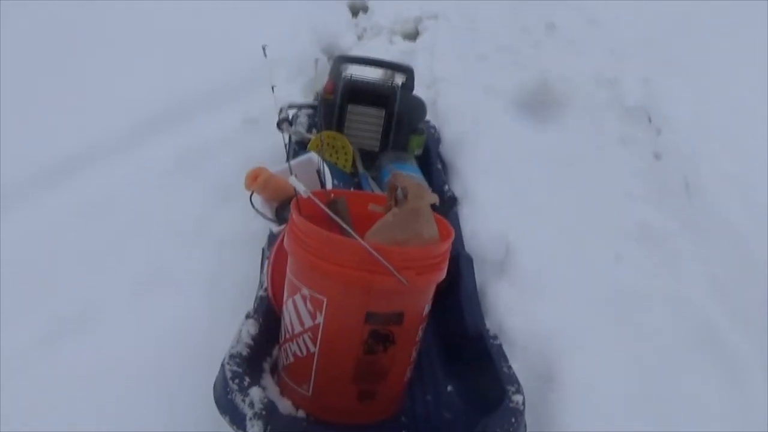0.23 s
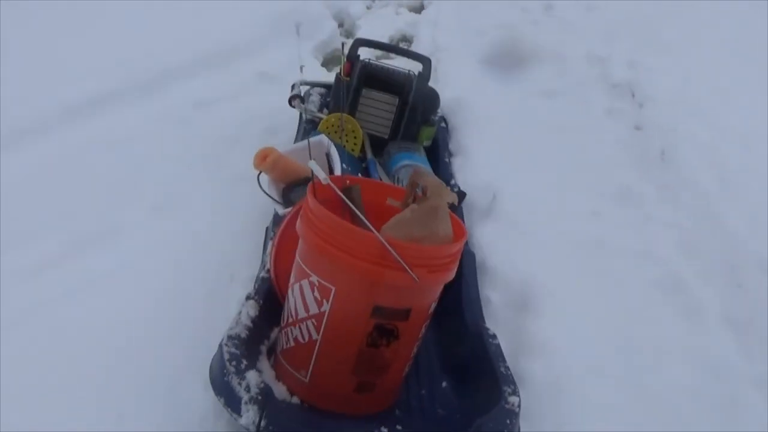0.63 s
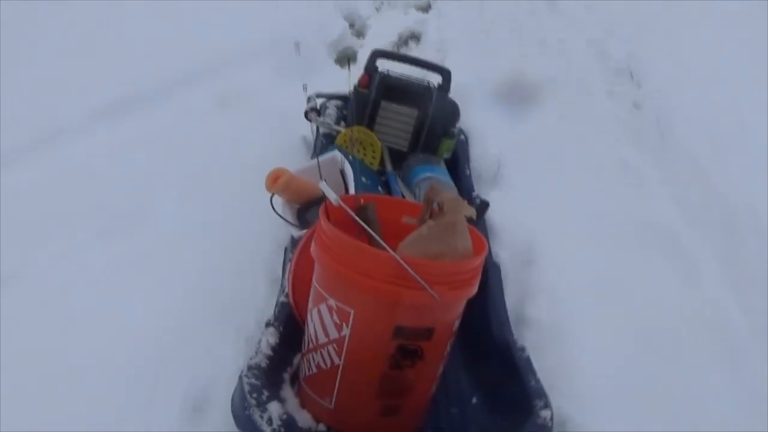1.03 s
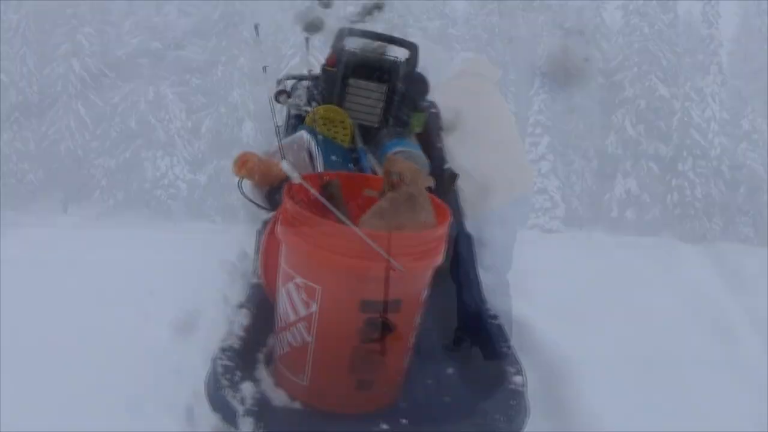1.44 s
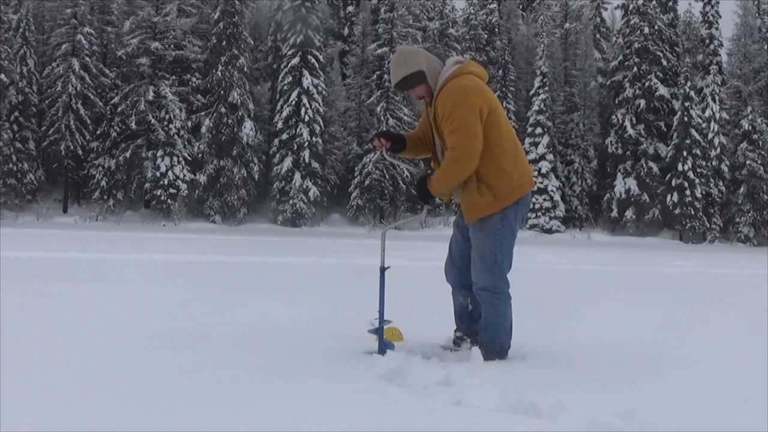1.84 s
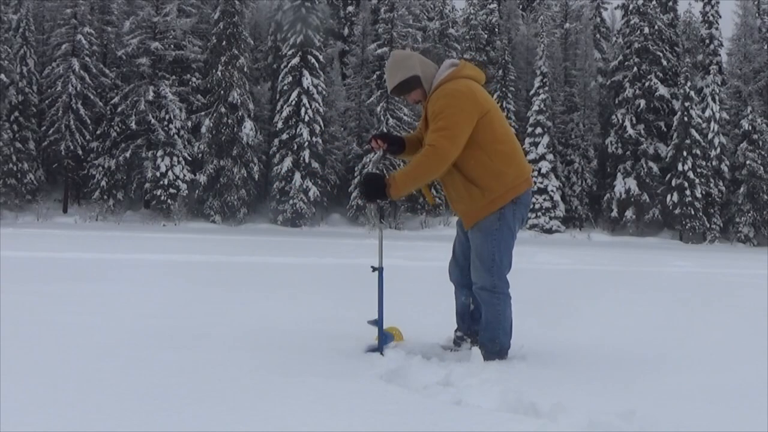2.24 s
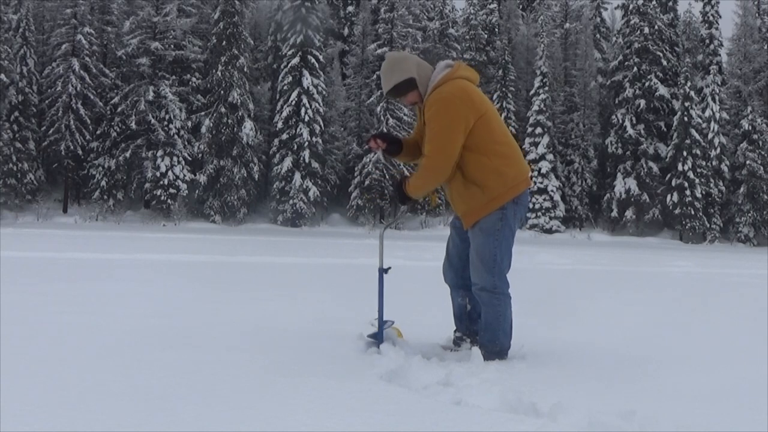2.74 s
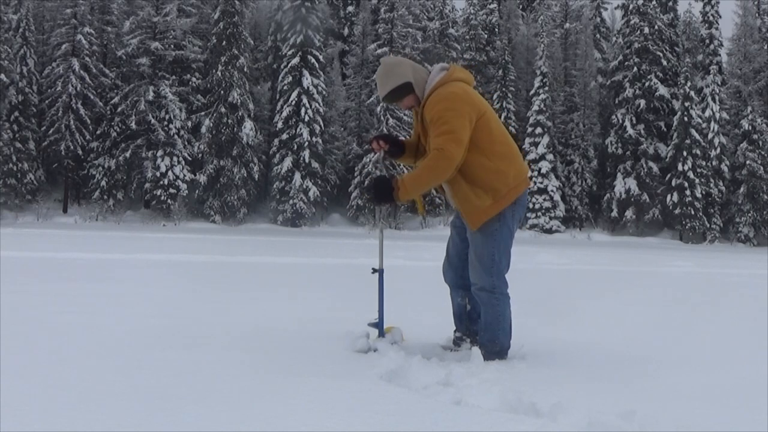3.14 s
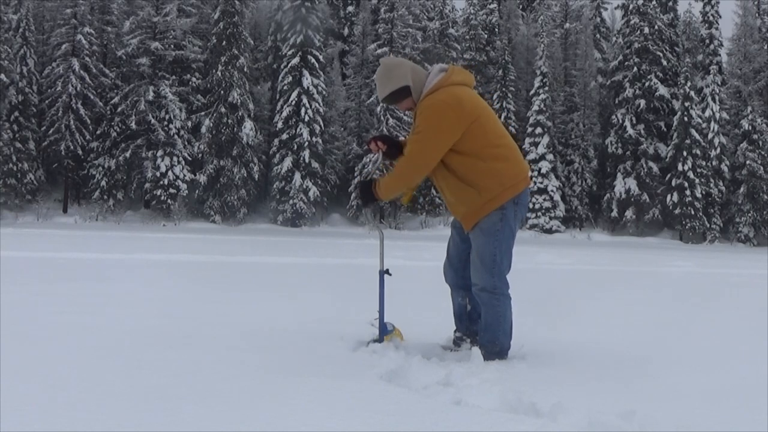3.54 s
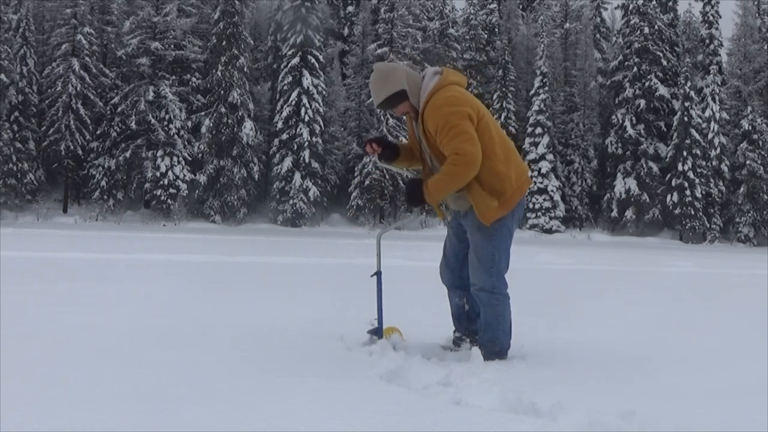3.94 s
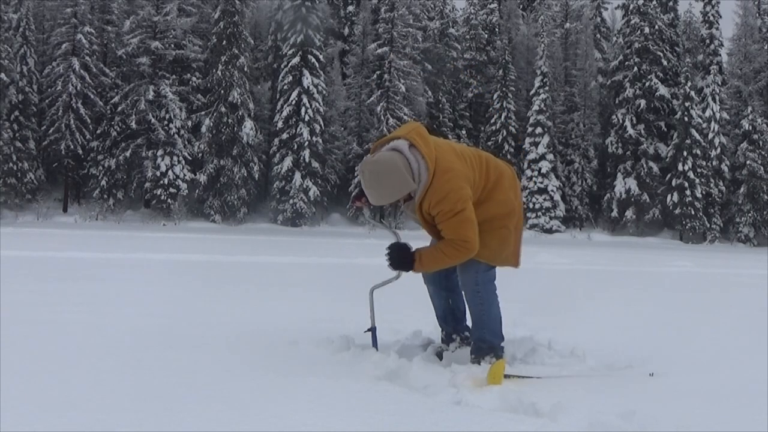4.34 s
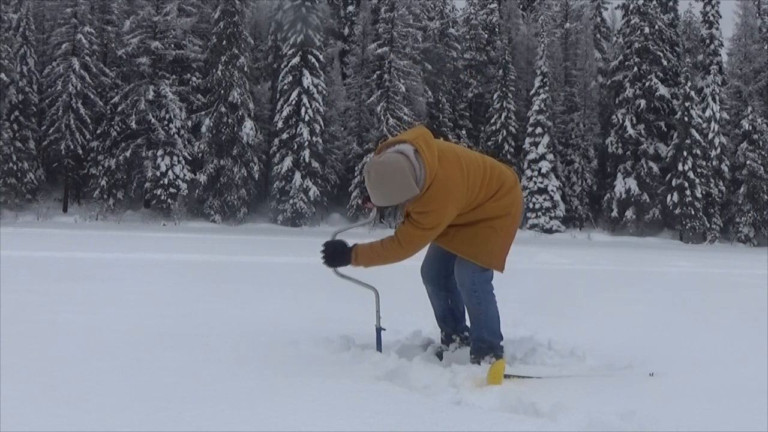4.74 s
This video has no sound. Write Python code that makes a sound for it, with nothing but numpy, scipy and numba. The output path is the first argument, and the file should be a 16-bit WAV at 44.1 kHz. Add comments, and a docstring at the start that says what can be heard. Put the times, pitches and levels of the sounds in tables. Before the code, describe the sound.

Sled hull grinding and hissing over deep snow dissolves into gritty, ringing scrapes of a hand ice auger, ending with metallic squeals.

```python
"""A loaded plastic sled grinds through deep snow: slips thump the hull, runners scrape, crystals hiss, crust crunches.
It dissolves to a hand auger shaving lake ice near the surface: chattering blades rasp the ice and ring the steel.
Then it jumps to the same auger deep in its hole, stalling, ticking as chips snap, biting again and squealing.
Filtered noise makes every layer. The place is an open snowfield: no echo reaches the stereo microphone."""
import sys
import numpy as np
from scipy import signal
from scipy.fft import rfft, irfft, next_fast_len
from scipy.io import wavfile
from scipy.ndimage import uniform_filter1d
from numba import njit

SR = 44100
rng = np.random.default_rng(int(sys.argv[2]) if len(sys.argv) > 2 else 0)


def pcm_store(signal):
    """Save signal as 16-bit PCM."""
    levels = np.round(np.clip(np.atleast_2d(signal), -1, 1) * 32767)
    wavfile.write(sys.argv[1], SR, levels.astype(np.int16).T)


N = 219814
T = np.arange(N) / SR  # time in s

# resonances of the sled hull: centre_hz, width_hz, relative_level_db
HULL_MODES = [(91, 74, -34), (143.4, 59, -3), (193.3, 36, 2), (243, 53, -0.5), (330, 115, -5),
              (457, 84, -4.5), (606, 174, -9), (715, 74, -15)]
# spectrum of the runner scrape: frequency_hz, level_db per Hz
SCRAPE_SPECTRUM = [(600, -13), (800, -1), (1000, -1), (1200, -4.5), (1700, -4.5), (2000, -10)]
# spectrum of the hissing snow crystals: frequency_hz, level_db per Hz
SNOW_SPECTRUM = [(1060, -36), (1800, -5.5), (2160, -4.5), (2980, -2), (3240, -6), (3710, -1.5),
                 (5270, -2.5), (6540, -6.5), (8580, 0), (9640, -5), (10600, -12.5), (15600, -28.5)]
# hull, runner scrape, snow hiss, before lurches and the hiss sag: level_db at 0 s, drift_db_per_s, fade_exponent
SLED_LEVELS = [(-26, 0.55, 1.3), (-32, -4, 1.8), (-27, -0.22, 0.97)]
# the sled lurches or rides light: start_s, length_s, hull_db, scrape_db
LURCHES = [(0.073, .03, -1, -1), (.11, 0.027, 0.5, 2.5), (.285, .025, 0.5, -1), (0.416, 0.045, -2.5, -0.5),
           (0.503, .025, -4, -2), (0.968, 0.026, 0, -2), (1.131, 0.015, 5, 3), (0.847, .035, -3, 0.5),
           (0.2, 0.063, -1.5, 1.5), (0.346, 0.032, 1.5, -5), (0.567, 0.12, 0.5, -1.5),
           (0.7, 0.12, -3.5, -1), (0.83, 0.046, 0.5, 1), (0.912, .022, 1, 0.5), (0.93, 0.016, -11, -5),
           (0.995, 0.18, -3, 0), (1.162, 0.028, 3.5, 0), (1.204, .022, -7.5, 0), (1.233, 0.02, 2, 0),
           (1.256, 0.059, -10, -2.5)]
# snow crust crunching under the hull: start_s, peak_db, centre_hz, t60_s
CRUNCHES = [(0.0375, -16, 1300, 0.03), (0.1161, -17.5, 4280, 0.03), (0.135, -18, 4700, 0.012),
            (0.1506, -23, 1640, 0.04), (0.1595, -17, 4800, 0.03), (0.2173, -17, 2300, 0.012),
            (0.1052, -20, 2800, .015), (0.3315, -21, 3000, .015), (0.2677, -13, 2400, 0.01),
            (0.2685, -18, 5200, 0.008), (0.4648, -18, 5600, 0.04), (0.469, -16.5, 4850, .03),
            (0.4738, -17, 3010, 0.025), (0.83, -17, 970, .03), (0.8744, -18, 1660, 0.025)]
# place of the sled between the channels: frequency_hz, left_minus_right_db, left_lead_rad
SLED_PAN = [(25, -5, .3), (110, -3.5, .1), (200, -2.5, .2), (400, -2, .4), (700, 0, .3), (1300, .5, .15),
            (1900, 0, 0), (2700, -1.2, -.3), (3300, -.6, 0), (4000, -.3, .25), (5300, 0, 0),
            (7300, -.1, -.25), (8600, 0, 0)]
# stereo width of the sled: frequency_hz, side_minus_mid_db
SLED_WIDTH = [(25, -6), (60, -16), (400, -19), (1300, -15), (1900, -24), (3300, -12), (4500, -22),
              (5300, -40), (6500, -16), (8200, -18), (9000, -60), (15000, -70)]
# fade-out of the sled: start_s, end_s
SLED_FADE_S = (1.655, 1.875)
# fade-in of the drilling: start_s, end_s
DRILLING_FADE_S = (1.55, 1.934)

# auger near the surface: time_s, cutting_db, treble_shavings_db
SHALLOW_CUT = [(1.9, -39.5, -38.5), (2.08, -40.5, -34), (2.19, -41.5, -43), (2.44, -37, -32),
               (2.65, -35, -33.5), (2.8, -35, -35.5), (2.98, -37, -35.5), (3.07, -35, -32.5),
               (3.16, -36, -34.5), (3.3, -33.5, -30), (3.43, -33.5, -33), (3.55, -29.5, -26),
               (3.625, -28, -29.5), (3.66, -25.5, -27), (3.71, -28.5, -29), (3.76, -30.5, -30.5),
               (3.82, -33, -39), (3.95, -31.5, -31.5), (4.14, -31, -31), (4.205, -31.5, -31)]
# auger deep in the hole: time_s, cutting_db, treble_shavings_db
DEEP_CUT = [(4.228, -36.5, -39), (4.245, -41, -42), (4.27, -46.5, -43), (4.33, -43, -53), (4.42, -42, -51),
            (4.46, -39.5, -41.5), (4.51, -34.5, -40), (4.61, -36.5, -40), (4.75, -37, -39),
            (4.83, -35, -37), (4.92, -32, -36), (4.955, -27, -31.5), (4.98, -30.5, -32.5)]
# rasp of the ice crumbs: frequency_hz, level_db per Hz
ICE_SPECTRUM = [(300, -14.5), (500, -6.5), (900, -16.5), (2000, -6), (3300, -10.5), (4500, -8.5),
                (6500, -7.5), (7300, -7), (9000, -6.5), (10600, -18), (11200, -16), (12000, -15.5),
                (15700, -27)]
# modes of the steel shaft and flights: centre_hz, width_hz (before widening in auger), surface_db, deep_db
STEEL_MODES = [(565, 58, -5, 3.5), (657, 56, -4.5, -16), (715, 42, -3, 1), (782, 92, -9.5, -8),
               (990, 24, -15, -4.5), (1081, 98, 0, -8), (1282, 164, -4.5, -13), (1637, 108, -4, -5.5),
               (1850, 160, -5, -8), (2108, 135, -7, -6), (2413, 150, -3.5, -5.5), (2750, 305, -3, -7),
               (3325, 290, -5, -7.5), (3676, 55, 0, -3.5), (3900, 120, -2, -5.5), (4213, 107, -0.5, -3),
               (4400, 90, -2.5, -5), (4670, 70, -1, -4), (5050, 130, -14, -5), (5370, 88, -4.5, -8),
               (5900, 145, -3.5, .5), (6430, 170, -3.5, -5.5), (6610, 120, -6.5, -14), (7900, 190, -4, -28),
               (8330, 93, -7, -2.5), (8900, 170, -2, -16), (9180, 200, -21, -4), (10080, 330, -1, -7),
               (11050, 420, -11, -23)]
# the chatter locks on the nearest steel mode or, below 0 dB, shuns it: start_s, length_s, mode_hz, gain_db
LOCKS = [(1.85, 1.4, 3314, -8), (1.85, .55, 2750, -2.5), (2.98, .12, 6420, 5.5), (1.96, .03, 5060, 21),
         (2.1, .12, 5900, 5), (2.39, .035, 4670, 6), (2.475, .05, 8330, 14), (2.44, .04, 2750, 8),
         (2.4, 0.19, 1290, 3), (2.74, .1, 3680, 3.5), (2.76, .05, 3900, 9), (3.05, .04, 1290, 5),
         (3.1, .15, 4670, 3), (4.2, .025, 5060, 12), (3.95, .03, 565, 7), (4.5, .016, 1640, 8),
         (4.058, 0.06, 2750, 6.5), (3.26, .12, 1290, 3), (2.63, .035, 3900, 4), (4.945, .035, 9220, 7),
         (4.86, .02, 9220, 6), (4.065, .045, 2410, 6), (4.082, .014, 1080, 7), (4.082, .014, 1290, 7),
         (4.055, .02, 565, 10), (4.07, .02, 5060, 12), (4.6, .014, 5370, 11), (2.49, 0.16, 6600, 11),
         (2.726, 0.055, 5370, 9.5), (2.83, 0.08, 8900, 10.5), (2.81, 0.14, 10080, 3),
         (3.202, .06, 5370, 10), (3.268, 0.12, 2750, 7), (3.27, .06, 2410, 4), (2.633, .05, 3900, 10.5),
         (2.66, .07, 4670, 3), (2.74, 0.049, 1290, 2), (2.877, 0.065, 4220, 5), (2.9, 0.062, 1290, 7),
         (3.132, 0.027, 2750, 7), (3.27, 0.098, 1080, 4.5), (3.51, 0.09, 6600, 9), (3.55, 0.056, 6420, 5),
         (3.1, 0.066, 1080, 2.5), (3.487, 0.07, 1290, 4), (3.52, .07, 5370, 4), (3.35, .09, 3314, -12),
         (3.35, .09, 5060, -6), (3.635, .05, 3900, 6), (3.647, 0.029, 1290, 7.5), (3.647, 0.032, 1850, 9),
         (3.645, .04, 2750, 4), (3.638, 0.052, 657, 7), (3.65, .03, 4220, 0), (4.1, 0.018, 4220, 5),
         (3.735, .025, 5900, 8), (3.72, 0.073, 1080, 6.5), (3.725, 0.069, 1850, 11), (3.93, 0.061, 5900, 8),
         (4.234, 0.087, 565, 11), (4.292, 0.044, 715, 12), (4.452, 0.16, 5900, 4), (4.62, .04, 5900, 7),
         (4.696, 0.12, 5900, 3), (4.23, 0.088, 1290, -8), (4.232, .1, 1850, -4), (4.23, .1, 2108, -8),
         (4.49, 0.27, 3680, 7), (4.62, .14, 4400, 2.5), (4.8, 0.046, 2750, 6.5), (4.815, .03, 1850, 5),
         (4.9, .08, 2108, 3), (4.926, 0.046, 5900, 0.5), (4.836, 0.17, 780, 11.5), (4.63, 0.053, 4400, 9),
         (4.883, 0.046, 4400, 11), (4.935, .04, 1640, 12), (4.83, .15, 5900, -4), (4.675, .02, 1640, 5),
         (4.95, 0.033, 780, 5)]
# lines of the singing blades, each filtered twice: centre_hz, width_hz of one pass
BLADE_LINES = [(9890, 130), (10260, 130)]
# relative level of each blade line in db: row near the surface, row deep in the hole
BLADE_LEVELS = [(4.5, 4), (-14, -5)]
# near the surface, then deep; rows hollow of the hole, shaft groan, blade song (before its swell):
# over_cutting_db, lost_db per db of harder cutting, drift_db_per_s
BAND_LEVELS = [
    [(-10.5, 0.16, 2.5), (-8.5, 0.13, 2), (-1, .5, -1)],
    [(-5.5, 0.33, -4.5), (-3.5, 0.43, -9.5), (-11, 0.1, -10)],
]
# spectrum of the low rumble: frequency_hz, level_db per Hz
RUMBLE_SPECTRUM = [(15, -59), (25, -45), (43, -33), (108, 0), (161, -5), (265, -7), (298, -12.5),
                   (369, -20), (420, -12), (550, -28), (920, -120)]
# level of the low rumble: time_s, lower_part_db, upper_part_db
RUMBLE_LEVELS = [(1.9, -49.5, -52), (2.25, -47.5, -51.5), (2.44, -51, -53), (2.68, -43.5, -49),
                 (3.0, -46, -47), (3.22, -50, -52), (3.45, -47.5, -46.5), (3.58, -50, -47.5),
                 (3.85, -39.5, -45), (4.37, -56, -46.5), (4.45, -47, -48.5), (4.7, -56.5, -44.5),
                 (4.86, -48, -39), (4.98, -47, -52)]
# spectrum of the still air: frequency_hz, level_db per Hz
AIR_SPECTRUM = [(300, -8.5), (1000, -12), (9000, -17), (11000, -19), (15700, -27)]
# ice chips snapping: start_s, peak_db, centre_hz, t60_s
SNAPS = [(2.645, -24, 3850, .015), (2.7447, -21, 5380, 0.022), (3.5837, -18, 4000, .015),
         (3.7304, -14.5, 1820, .02), (3.7414, -15, 5990, .026), (3.9035, -17, 6800, .012),
         (3.799, -12, 7740, 0.011), (3.8046, -14.5, 7000, 0.0089), (4.2725, -27, 4000, .03),
         (4.3835, -25, 4400, 0.018), (4.4014, -34, 2960, 0.015), (4.4233, -20, 2600, 0.028),
         (4.4449, -19, 2900, 0.008), (4.4451, -17, 6100, .007), (4.501, -26, 9200, .012),
         (4.547, -25, 3900, .03), (4.6374, -20, 4200, 0.019), (4.712, -22, 5900, .03),
         (4.81, -22, 1100, 0.033), (4.8214, -20, 5100, .02), (4.9294, -16, 2500, .01)]
# stereo width of the drilling: frequency_hz, side_minus_mid_db
AUGER_WIDTH = [(25, -8), (60, -30), (200, -20.5), (400, -13.5), (800, -19.5), (1400, -25), (2000, -33.5),
               (3000, -17), (4000, -29.5), (4800, -41), (5800, -20.5), (8000, -23), (9000, -64),
               (15000, -70)]
# two close modes on which the shaft squeals against the deep wall: centre_hz, width_hz of one filter stage
SQUEAL_MODES = [(980, 60), (1045, 105)]
# level of the squeal: time_s, lower_mode_db, upper_mode_db
SQUEAL_LEVELS = [(4.6, -55, -58), (4.625, -40, -45), (4.645, -33, -41), (4.68, -41, -37), (4.715, -38, -35),
                 (4.77, -41, -38), (4.81, -36, -38), (4.835, -39, -37), (4.86, -36, -33), (4.89, -36, -35),
                 (4.93, -31, -35), (4.955, -35, -36), (4.98, -33, -38)]

HISS_PEAK_S, HISS_SAG_DB_PER_S = 0.65, 3
ICE_DEEP_TILT_DB = -1.5  # per octave: the hole swallows treble
USUAL_CUT_DB = -35
SONG_SWELL_DB, SONG_PERIOD_S, SONG_PEAK_S = 3, 0.248, 2.6
DRIFT_SHARE, DRIFT_RATE = 0.018, 12  # pitch spread of unlocked bending modes, changes per s
STALL_S, STALL_LENGTH_S, STALL_DB = 4.34, 0.0754, -11.5
AIR_DB = -50.5
TOP_HZ = 15780


def undb(db):
    """Decibels to amplitude."""
    return np.exp(np.asarray(db) * (np.log(10) / 20))


def unit(x):
    """Scale to an RMS level of 1."""
    return x / np.sqrt(np.mean(x ** 2))


def curves(table):
    """Join the points of each column into a curve over time."""
    s, *columns = np.transpose(table)
    return [np.interp(T, s, c) for c in columns]


def plateau(s, length, edge_s):
    """1 from s for length s, 0 outside, with short ramps."""
    return np.clip(np.minimum(T - s, s + length - T) / edge_s + .5, 0, 1)


def shape(x, points, share=1):
    """Filter by (Hz, dB) or (Hz, dB, phase lead) points joined on a log axis."""
    size = next_fast_len(N)
    hz, *rows = np.transpose(points)
    f = np.maximum(np.arange(size // 2 + 1) * SR / size, 1)
    db, *lead = (share * np.interp(np.log(f), np.log(hz), r) for r in rows)
    return irfft(rfft(x, size) * undb(db) * np.exp(1j * sum(lead)), size)[:N]


def cut(x, lo_hz, hi_hz):
    """Steep band limits."""
    return signal.sosfilt(signal.butter(4, [lo_hz, hi_hz], "band", fs=SR, output="sos"), x)


def ring(x, hz, width):
    """One resonance, gain 1 at its centre."""
    return signal.lfilter(*signal.iirpeak(hz, hz / width, fs=SR), x)


def walk(rate):
    """Random levels held 1 / rate s and slewed twice; spread near 1."""
    k = int(SR / rate)
    steps = np.repeat(rng.standard_normal(N // k + 1), k)
    return 1.41 * uniform_filter1d(uniform_filter1d(steps, k), k)[:N]


def grit(rate, spread_db):
    """Fractures at random moments and of random size; a positive spread_db makes a few much larger."""
    hit = rng.random(N) < rate / SR
    size_db = spread_db * np.minimum(rng.exponential(size=N), 3.5)
    return unit(hit * rng.standard_normal(N) * undb(size_db))


def patchy(x, flicker_db, rate, count=20):
    """Overlapping bands, even on a near-log axis, that flicker each on their own."""
    size = next_fast_len(N)
    place = np.log2(1 + np.arange(size // 2 + 1) * SR / size / 250)
    place = place * (count - 1) / place[-1]
    spectrum, out = rfft(x, size), np.zeros(N)
    for k in range(count):
        band = irfft(spectrum * np.clip(1 - np.abs(place - k), 0, 1), size)[:N]
        out += undb(flicker_db * walk(rate)) * band
    return out


def steady(x, span_s, extra=0):
    """Hold the short-term level of x at 1, so that curves alone set the swell; extra rides on top at the same gain."""
    return (x + extra) / np.sqrt(uniform_filter1d(x ** 2, int(span_s * SR)) + 1e-18)


def widen(mid, loose, wide):
    """Left and right share the sound but for a side part, made from loose, of opposite sign in each."""
    side = shape(loose, wide)
    return np.array([mid + side, mid - side])


def sled_gains():
    """Levels of hull, scrape and hiss: drift and fade-out, lurches on the first two, a sag about a peak on the hiss."""
    fade = np.clip((SLED_FADE_S[1] - T) / (SLED_FADE_S[1] - SLED_FADE_S[0]), 0, 1)
    hull, scrape, hiss = (undb(db + drift * T) * fade ** steep for db, drift, steep in SLED_LEVELS)
    hiss = hiss * undb(-HISS_SAG_DB_PER_S * np.abs(T - HISS_PEAK_S))
    for s, length, hull_db, scrape_db in LURCHES:
        now = plateau(s, length, 0.011)
        hull = hull * undb(hull_db * now)
        scrape = scrape * undb(scrape_db * now)
    return hull, scrape, hiss


def hull_thumps(judder):
    """Snow lumps slip under the hull and excite its low resonances."""
    slips = [grit(1500, spread_db=1.5) * judder for _ in range(2)]  # two runners drive alternate modes
    hull = np.zeros(N)
    for k, (hz, width, db) in enumerate(HULL_MODES):
        hull += undb(db + 2.4 * walk(12.58)) * ring(slips[k % 2], hz, width)
    hull = signal.lfilter(*signal.butter(2, 100, "high", fs=SR), hull)
    return steady(cut(hull, 25, 675), .07)


def runner_scrape():
    """Dense fractures along the runners, limited to a flickering middle band."""
    scrape = shape(grit(5000, spread_db=2.5), [(300, -60), *SCRAPE_SPECTRUM, (3500, -60)])
    return unit(patchy(scrape, flicker_db=1.0, rate=16.7))


def snow_hiss():
    """Very dense, even crystal fractures hiss along the runners."""
    hiss = patchy(shape(grit(15000, spread_db=-1.0), SNOW_SPECTRUM), flicker_db=-0.5, rate=14.03)
    return unit(hiss * undb(0.27 * walk(30.0)))


def cracks(table, width):
    """Crust or chips snap: short bursts of noise in a wide band, dying fast."""
    length = 3000  # samples
    out = np.zeros(N)
    for (s, db, hz, t60), noise in zip(table, rng.standard_normal((len(table), length))):
        burst = noise * np.exp(-np.log(1000) * np.arange(length) / SR / max(t60, .003))
        burst = cut(ring(burst, hz, width * hz), 290, 9300)
        i = int(s * SR)
        out[i:i + length] += (undb(db) * burst / np.abs(burst).max())[:N - i]
    return out


def sled():
    """Hull, scrape and hiss in two takes of chance, the second for stereo width, with crunching crust on the first."""
    hull_gain, scrape_gain, hiss_gain = sled_gains()
    judder, takes = undb(0.38 * walk(31.2)), []
    for _ in range(2):
        ground = hull_thumps(judder) * hull_gain + runner_scrape() * scrape_gain
        takes.append(ground + snow_hiss() * hiss_gain)
    left, right = widen(takes[0] + cracks(CRUNCHES, width=0.35), takes[1], SLED_WIDTH)
    return np.array([shape(left, SLED_PAN, .5), shape(right, SLED_PAN, -.5)])


def still_air():
    """Steady, softly shaped noise of the open air."""
    return unit(shape(rng.standard_normal(N), AIR_SPECTRUM)) * undb(AIR_DB)


def rumble():
    """Low, lumpy noise under the drilling, in two parts that swell separately."""
    low_db, high_db = curves(RUMBLE_LEVELS)
    lumps = shape(grit(2500, spread_db=0.0), RUMBLE_SPECTRUM)
    low = signal.sosfiltfilt(signal.butter(3, 160, fs=SR, output="sos"), lumps)
    return unit(low) * undb(low_db) + unit(lumps - low) * undb(high_db)


def locking(k):
    """Gain in dB of steel mode k while the chatter locks on it or shuns it."""
    modes, db = np.array([m[0] for m in STEEL_MODES]), np.zeros(N)
    for s, length, hz, gain_db in LOCKS:
        if np.argmin(np.abs(modes - hz)) == k:
            db += gain_db * plateau(s, length, 0.015)
    return db


@njit
def sway(x, hz, width, bend):
    """A steep resonance (two state-variable stages) whose centre is hz times bend."""
    y, state, k = np.empty(len(x)), np.zeros(4), width / hz
    centre = np.tan(np.pi * hz / SR)
    for i in range(len(x)):
        g, u = centre * bend[i], x[i] + 1e-18
        for j in (0, 2):
            v = (state[j] + g * (u - state[j + 1])) / (1 + g * (g + k))
            state[j], state[j + 1], u = 2 * v - state[j], state[j + 1] + 2 * g * v, k * v
        y[i] = u
    return y


def steel_ringing(blades, deep):
    """Blade chatter rings the bending shaft and flights; returns the free ringing and what locking adds to it."""
    free, locked = np.zeros(N), np.zeros(N)
    for k, (hz, width, *db) in enumerate(STEEL_MODES):
        lock_db = locking(k)
        calm = 1 / (1 + np.abs(lock_db) / 3)  # a locked mode holds steady
        # the highest modes belong to the blades and keep their pitch
        bend = 1 + DRIFT_SHARE * walk(DRIFT_RATE) * calm * (hz < 9600)
        flicker = undb(db[deep] + 2.8 * walk(28) * calm)
        mode = flicker * sway(blades[k % 2], 1. * hz, 1.5 * width, bend)
        free += mode
        locked += (undb(lock_db) - 1) * mode
    return free, locked


def blade_lines(chatter, deep):
    """The blades sing on narrow high lines that flicker on their own."""
    out = np.zeros(N)
    for (hz, width), db in zip(BLADE_LINES, BLADE_LEVELS[deep]):
        line = ring(ring(grit(9000, spread_db=2.0) * chatter, hz, width), hz, width)
        out += undb(db + 2.6 * walk(14)) * line
    return out


def auger(table, deep):
    """Blades chip the ice in an uneven chatter; the chips rasp and ring the steel, each mode coming and going."""
    cut_db, fine_db = curves(table)
    hollow_db, groan_db, song_db = (
        db - lost * (cut_db - USUAL_CUT_DB) + drift * (T - table[0][0]) for db, lost, drift in BAND_LEVELS[deep])
    song_db = song_db + SONG_SWELL_DB * np.cos(2 * np.pi * (T - SONG_PEAK_S) / SONG_PERIOD_S)

    chatter = undb(0.55 * walk(45) + 0.89 * walk(16))
    crumbs, *blades = (grit(9000, spread_db=2.0) * chatter for _ in range(3))  # loose crumbs and the two blades
    rasp = [(hz, db + deep * ICE_DEEP_TILT_DB * np.log2(hz / 1000)) for hz, db in ICE_SPECTRUM]
    ice = patchy(shape(crumbs, rasp), flicker_db=2.5, rate=20, count=34)
    steel, locked = steel_ringing(blades, deep)
    free = ice + steel + blade_lines(chatter, deep)

    # hollow, groan, bite, fine shavings, blade song, dust
    bands_hz = [(330, 850), (850, 1400), (1400, 5000), (5000, 9600), (9600, 10550), (10550, 17000)]
    parts = (cut(np.array([free, locked]), *band) for band in bands_hz)
    hollow, groan, bite, fine, song, dust = (steady(part, 0.096, extra) for part, extra in parts)
    shavings = undb(fine_db) * (fine + undb(-8.5 - 2.5 * deep) * dust)
    cutting = bite + undb(hollow_db) * hollow + undb(groan_db) * groan + undb(song_db) * song
    return undb(cut_db) * cutting + shavings


def squeal():
    """Uneven slips ring two close modes of the shaft, which hardly change pitch."""
    judder, bend = undb(2.2 * walk(45)), 1 + .006 * walk(20)
    tones = np.zeros(N)
    for (hz, width), db in zip(SQUEAL_MODES, curves(SQUEAL_LEVELS)):
        tone = sway(grit(3000, spread_db=3.0) * judder, 1. * hz, 1. * width, bend)
        tones += steady(tone, 0.039) * undb(db)
    return tones * (T > SQUEAL_LEVELS[0][0])


def drilling():
    """Both depths of the hole; the sound dips at the jump between them, and cutting and rumble hush in the stall."""
    jump = (SHALLOW_CUT[-1][0] + DEEP_CUT[0][0]) / 2
    dip = np.clip(np.abs(T - jump) / 0.0053, .1, 1)
    hush = undb(STALL_DB * plateau(STALL_S, STALL_LENGTH_S, 0.0058))
    cutting = np.where(T < jump, auger(SHALLOW_CUT, deep=0), auger(DEEP_CUT, deep=1))
    near = dip * (hush * (cutting + rumble()) + still_air() + squeal())

    # a brief random scatter that differs left and right
    smear = rng.standard_normal(2000) / np.sqrt(2000)
    scattered = signal.fftconvolve(near, smear)[1000:N + 1000]
    pair = widen(near + cracks(SNAPS, width=0.72), scattered, AUGER_WIDTH)
    return pair * np.clip((T - DRILLING_FADE_S[0]) / (DRILLING_FADE_S[1] - DRILLING_FADE_S[0]), 0, 1)


def scene():
    """The sled fades out as the drilling fades in."""
    return sled() + drilling()


def record(dry):
    """The recorder cuts the top."""
    return signal.sosfilt(signal.ellip(16, .3, 90, TOP_HZ, fs=SR, output="sos"), dry)


dry = scene()
out = record(dry)
pcm_store(out)
```